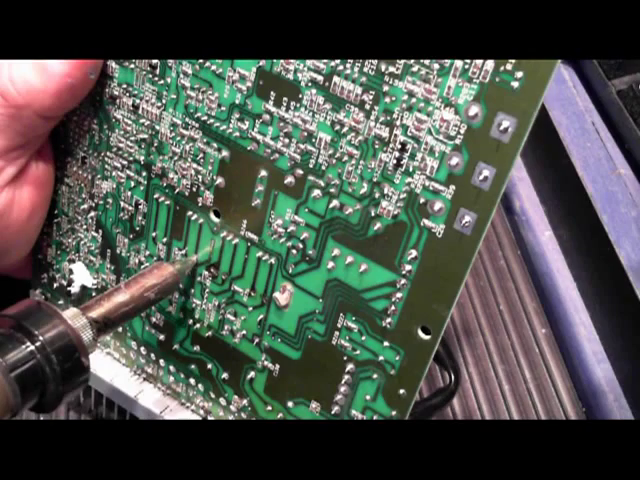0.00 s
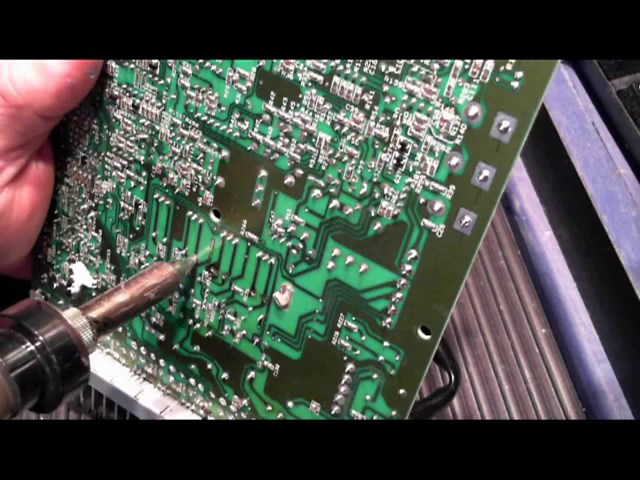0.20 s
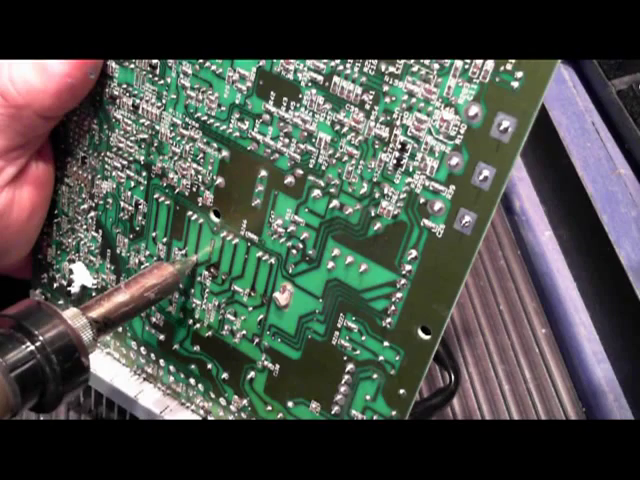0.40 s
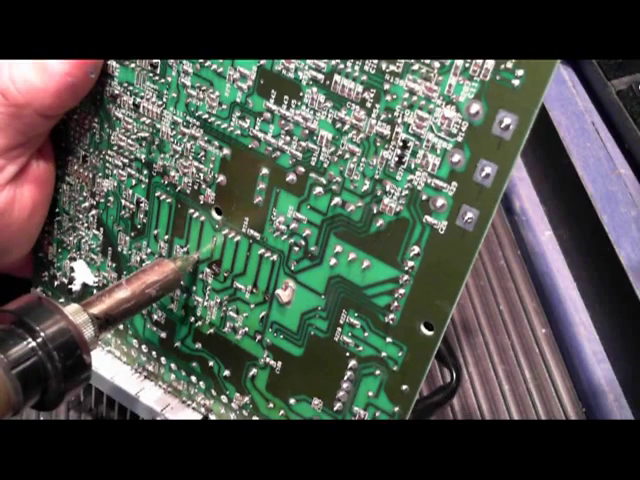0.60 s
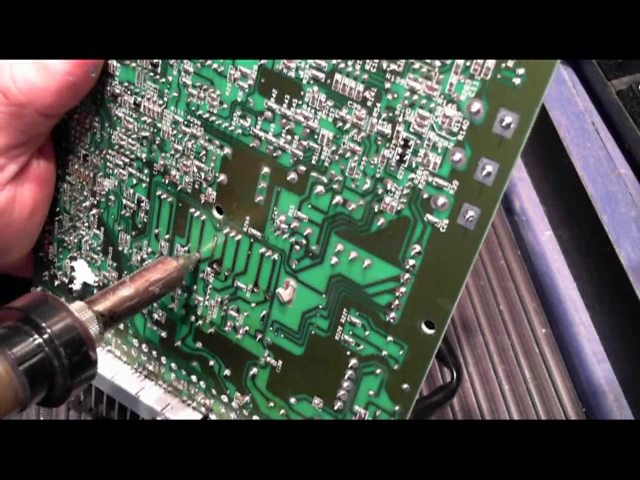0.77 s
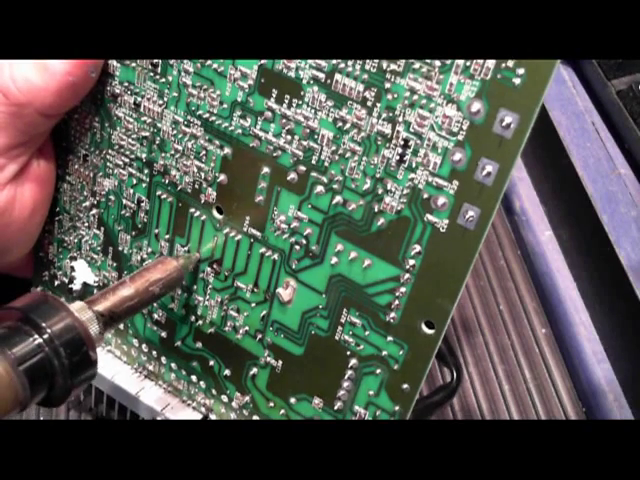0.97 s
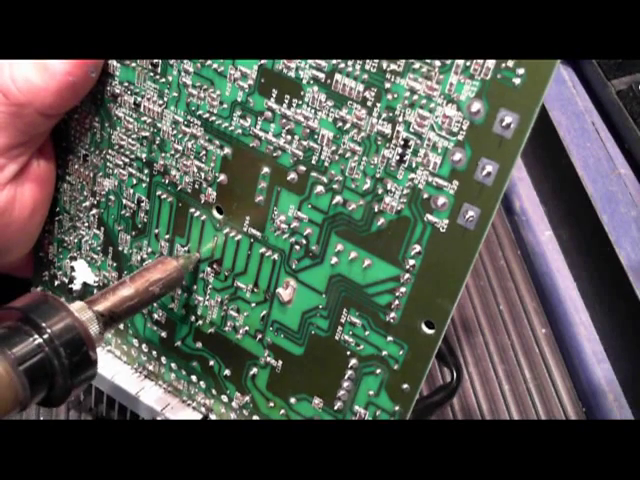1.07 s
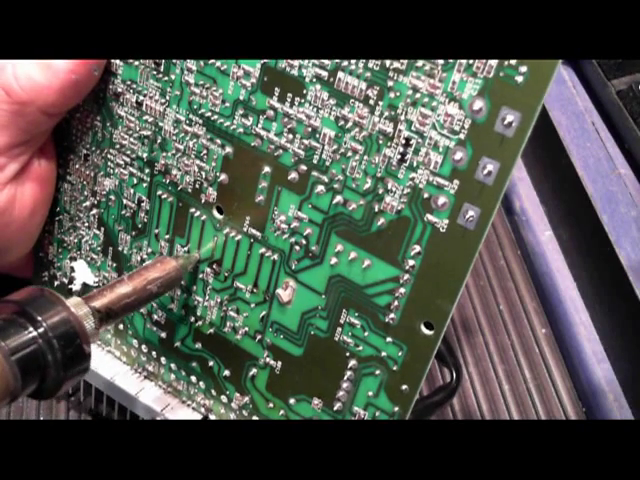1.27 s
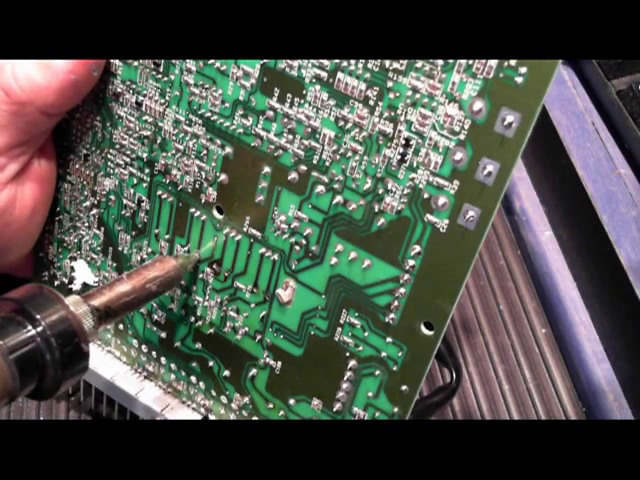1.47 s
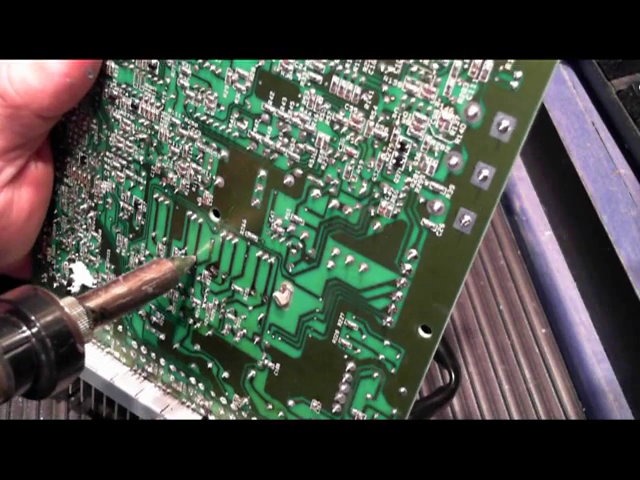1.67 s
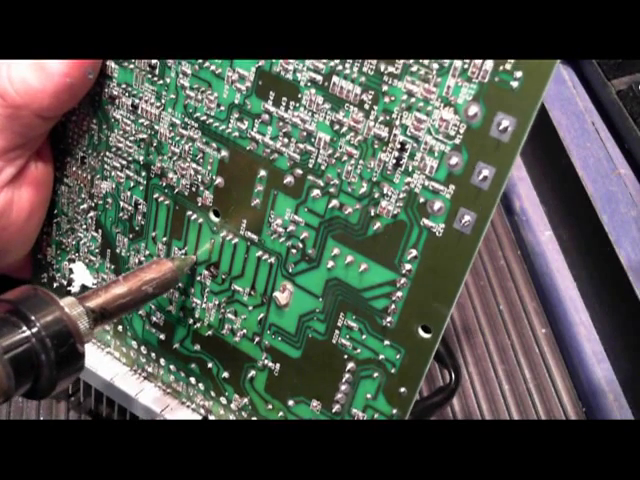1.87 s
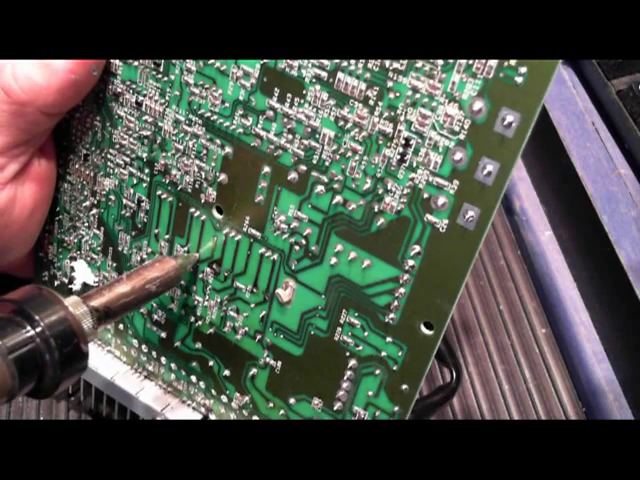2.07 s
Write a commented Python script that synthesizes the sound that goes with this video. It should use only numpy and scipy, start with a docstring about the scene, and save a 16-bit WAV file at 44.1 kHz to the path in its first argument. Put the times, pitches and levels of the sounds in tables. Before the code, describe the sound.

A desoldering gun's diaphragm pump clicks on, knocks, and revs up into a rattling, airy buzz that sags slightly, then clacks to a stop; close microphone in a quiet workshop, low rumble during the later part.

```python
"""A trigger clicks and a small pump buzzes up, sags a little under vacuum, then slows as it dies away.
It is the diaphragm pump of a desoldering gun, in a quiet workshop with low rumble buffeting the microphone.
One turning shaft times the sound: its multiples make the whine and the knock pattern, and its angle
gates the rattle and the rush of air. Noise bursts make the single knocks; fading tones and noise make
the clicks. Filtered noise makes the background and rumble."""
import sys
import numpy as np
from scipy import signal
from scipy.fft import rfft, irfft, next_fast_len
from scipy.io import wavfile
from scipy.ndimage import map_coordinates

SR = 44100
rng = np.random.default_rng(int(sys.argv[2]) if len(sys.argv) > 2 else 0)


def inscribe(sig):
    """Save sig as 16-bit PCM at rate SR to the path in sys.argv[1].

    A 1-D sig is mono; a 2-D sig holds one channel per row.
    Samples are clipped to [-1, 1] before scaling.
    """
    pcm = np.round(np.clip(np.atleast_2d(sig).T, -1, 1) * 32767)
    wavfile.write(sys.argv[1], SR, pcm.astype(np.int16))


def level_to_linear(level):
    """Convert decibel levels to linear amplitude factors, elementwise."""
    exponent = np.asarray(level, float) / 20
    return 10 ** exponent


N = 92610
TIME_S = np.arange(N) / SR

# Workshop background colour. Each row: frequency in Hz, relative level in dB per Hz.
WORKSHOP_TONE = [(59, -37), (100, -6), (355, -16), (434, -12), (489, -18.5), (648, -11.5), (702, -17),
                 (1210, -7), (2250, -4), (2700, -11.5), (4120, -14.5), (12200, -36), (15800, -63),
                 (22000, -120)]
# Low rumble on the microphone. Each row: time in seconds, level in dB.
BUFFET_LEVEL = [(0.0, -56), (0.02, -57.5), (0.84, -52), (0.87, -37.5), (0.91, -35.5), (1.0, -37),
                (1.05, -27.5), (1.09, -31.5), (1.19, -37.5), (1.21, -39), (1.24, -28), (1.39, -42),
                (1.44, -32.5), (1.64, -42.5), (1.67, -34), (1.83, -50), (1.94, -46), (2.1, -59.5)]
# Colours of the rumble and of its higher part. Each row: frequency in Hz, relative level in dB per Hz.
BUFFET_COLOUR = [(5.9, -15), (10, 16.5), (45, 8), (90, -15.5), (182, -21), (218, -31), (260, -37),
                 (340, -56), (570, -120)]
FLAP_COLOUR = [(25, -4), (50, 1), (90, -6), (140, -22.5), (250, -26), (400, -77), (600, -120)]
# How fast the room's answer dies. Each row: frequency in Hz, time to fall 60 dB in seconds.
ROOM_DECAY = [(300, 0.17), (1000, 0.45), (2000, 0.44), (10000, 0.28)]
# Trigger switch clicks. Each row: start in seconds, relative level in dB.
TRIGGER_CLICKS = [(0.2006, -26), (0.2127, -42), (1.6575, -20)]
# Ringing tones of the switch. Each row: frequency in Hz, relative level in dB, time to fall 60 dB in seconds.
SWITCH_TONES = [(3500, -10, .01), (5600, -1, .016), (7700, -4, .011)]
# Colour of each click's snap. Each row: frequency in Hz, relative level in dB.
SNAP_COLOUR = [(1200, -13), (2500, 2), (5400, -1), (8000, -7), (9000, -29), (12000, -19)]
# Last slow, dull strokes. Each row: start in seconds, relative level in dB.
LAST_THUDS = [(1.684, -37.5), (1.712, -39.5)]
# Tones of those strokes. Each row: frequency in Hz, relative level in dB, time to fall 60 dB in seconds.
THUD_TONES = [(480, 4.5, 0.027), (970, 6, 0.039)]
# Loud single knocks at start and stop. Each row: start in seconds, relative level in dB,
# relative brightness in dB.
SINGLE_KNOCKS = [(0.2305, -22.5, -1), (0.2375, -14, -2), (0.2455, -22, -21), (0.2495, -12, -4.5),
                 (0.2527, -10, -29), (0.2650, -26, -20), (1.6385, -17, -7), (1.6605, -12, -19),
                 (1.6745, -13, -20), (1.6925, -17, -24)]
# Resonances of the plastic housing. Each row: frequency in Hz, width in Hz, relative level in dB.
HOUSING_TONES = [(477, 53, -16), (690, 41, -14), (930, 110, -12.5), (1410, 73, -2), (1665, 135, -2),
                 (1926, 37, -0.5), (2025, 37, 1.5), (2230, 71, -2), (2452, 103, 0), (2640, 180, -2.5),
                 (2924, 168, -5.5), (3446, 260, -10), (4494, 430, -10), (5780, 850, -15.5)]
# Shaft speed, before the power-off slowing is taken away. Each row: time in seconds, turns per second.
SHAFT_SPEED = [(0.24, 48.5), (0.266, 54.9), (0.298, 62.8), (0.338, 72.8), (0.356, 77.0), (0.392, 83.0),
               (0.452, 89.4), (0.518, 93.1), (0.624, 92.3), (0.918, 89.0), (1.008, 88.5), (1.65, 87.4)]
# How hard the pump works. Each row: time in seconds, relative level in dB.
PUMP_EFFORT = [(0.222, -43), (0.236, -33), (0.243, -32.5), (0.25, -23.5), (0.258, -28), (0.276, -27),
               (0.45, -26.5), (0.63, -27.5), (0.85, -26), (1.05, -26), (1.2, -25.5), (1.3, -27), (1.4, -26),
               (1.55, -26), (1.64, -26), (1.678, -26.5), (1.686, -37.5), (1.697, -36), (1.708, -42.5),
               (1.73, -53)]
# Whine of the shaft. Each row: multiple of the shaft speed, relative level in dB.
WHINE_TONES = [(1, -16), (2, -19.5), (3, -18.5), (4, -8.5), (5, 1), (6, -12), (7, -10), (8, 0), (9, -12),
               (10, -8.5), (11, -9.5), (12, -7), (13, -6), (14, -25)]
# Air through the valves. Each row: frequency in Hz, relative level in dB per Hz.
AIR_COLOUR = [(120, -52), (300, -23.5), (600, -31), (1200, -11.5), (1500, -9), (2550, -4), (3600, -8.5),
              (6050, -11), (8000, -17.5), (10000, -30.5), (11500, -30.5), (14000, -66)]
# Colour of the valve tick. Each row: frequency in Hz, relative level in dB per Hz.
TICK_COLOUR = [(3000, -17), (4500, -3), (6300, 4), (9300, 2), (11500, -23.5), (14000, -35)]
# Colour of the slow shaft's rough shaking. Each row: frequency in Hz, relative level in dB per Hz.
LUG_COLOUR = [(60, -14), (200, -19.5), (330, -8), (470, 0.5), (600, -7), (950, 3.5), (1300, -11),
              (2000, -33)]
# Housing tones that ring on after the stop. Each row: frequency in Hz, relative level in dB.
RING_TONES = [(1908, 3.5), (1998, -18)]

WORKSHOP_DB, ROOM_DB = -57, -13
FLAP_DB, FLAP_GROWS = -4, 1.46  # the higher part rises faster than the rest of the rumble
SNAP_DB, SNAP_T60_S, SNAP_RISE_S = -9.5, 0.074, 0.00081
RING_SCATTER_DB = 1.5  # random difference between one event's tones and the next's
CRACK_HZ, CRACK_WIDE_HZ, CRACK_T60_S = 4600, 1500, 0.016
OFF_S, COAST_HZ_PER_S = 1.655, 750  # power cut, then the shaft slows
STROKE_DB, STROKE_JITTER_TURNS, STROKE_SCATTER_DB = -2.5, 0.0035, 2
WHINE_DB, WHINE_GROWS, WHINE_WAVER_DB = -38, 3.96, 1.1  # level; power of speed; unsteadiness
RING_DB, RING_T60_S = -17.5, 0.46
RATTLE_DB, RATTLE_GATE = -5, 0.23  # level; share gated twice a turn
GATE_SHARP = 5.8  # higher gives narrower bursts within the turn
AIR_DB, AIR_GATE, AIR_AT_TURN = -8, 0.25, 0.34  # level; gate depth; place in the turn
TICK_DB, TICK_SHARP = -26, 12
LUG_DB, LUG_BEAT_DB = -13, 1  # level; the regular beat over its noise
AIR_FADE_DB_PER_S = 250  # air and ticks thin out once the power is cut
TOP_HZ = 12050


def unit(x):
    """Scale to rms 1."""
    return x / np.sqrt(np.mean(x ** 2) + 1e-20)


def curve(rows):
    """Join (seconds, value) rows by straight lines, one value per sample."""
    seconds, values = np.transpose(rows)
    return np.interp(TIME_S, seconds, values)


def along(points, hz):
    """Join (Hz, value) points by straight lines on a log frequency axis."""
    point_hz, values = np.transpose(points)
    return np.interp(np.log(hz + 1), np.log(point_hz + 1), values)


def wobble(rate):
    """A smooth random curve with this many random points a second."""
    points = rng.standard_normal(int(N * rate / SR) + 4)
    return map_coordinates(points, [np.arange(N) * rate / SR])


def filtered(x, response):
    """Multiply the spectrum of x by a response that depends on frequency."""
    size = next_fast_len(N + SR // 2)
    hz = np.fft.rfftfreq(size, 1 / SR)
    return irfft(rfft(x, size) * response(hz), size)[:N]


def noise(colour):
    """Coloured noise of rms 1."""
    return unit(filtered(rng.standard_normal(N), lambda hz: level_to_linear(along(colour, hz))))


def turning_tone(multiple, turns):
    """A sine at a multiple of the shaft's turning, from a random phase."""
    return np.sin(2 * np.pi * (multiple * turns + rng.random()))


def turn_pulse(turns, place):
    """A smooth hump from 0 to 1, once a turn, highest at this place in the turn."""
    return 0.5 + 0.5 * np.cos(2 * np.pi * (turns - place))


def gate(turns, depth, place):
    """Loudness that swells once a turn."""
    return 1 - depth + depth * 2 * turn_pulse(turns, place) ** GATE_SHARP


def rings(events, modes, attack_s):
    """Each event starts its own set of fading sine tones."""
    out = np.zeros(N + SR)
    t = np.arange(SR // 5) / SR
    for start_s, event_db in events:
        ring = np.zeros(len(t))
        for hz, db, t60_s in modes:
            tone_db = db + rng.normal(0, RING_SCATTER_DB) - 60 * t / t60_s
            ring += level_to_linear(tone_db) * np.sin(2 * np.pi * hz * t)
        out[round(start_s * SR):][:len(t)] += level_to_linear(event_db) * ring * (1 - np.exp(-t / attack_s))
    return out[:N]


def housing(hz):
    """The plastic housing answers strongest near its resonances, which alternate in sign."""
    answer = 0
    for k, (centre, width, db) in enumerate(HOUSING_TONES):
        resonance = 1j * hz * width / (centre * centre - hz * hz + 1j * hz * width)
        answer = answer + (-1) ** k * level_to_linear(db) * resonance
    return answer


def workshop():
    """Steady coloured noise is the quiet room around the tool."""
    return level_to_linear(WORKSHOP_DB) * noise(WORKSHOP_TONE)


def rumble():
    """Low noise swells on the microphone; its higher part swells more steeply."""
    level_db = curve(BUFFET_LEVEL)
    peak_db = level_db.max()
    flap_db = peak_db + FLAP_DB + FLAP_GROWS * (level_db - peak_db)
    return level_to_linear(level_db) * noise(BUFFET_COLOUR) + level_to_linear(flap_db) * noise(FLAP_COLOUR)


def room(x):
    """A noise tail answers the sound; each frequency dies at its own speed."""
    hz, t, tail_bands = signal.stft(rng.standard_normal(SR // 2), SR, nperseg=256)
    fade = level_to_linear(-60 * t / along(ROOM_DECAY, hz)[:, None])
    tail = signal.istft(tail_bands * fade, SR, nperseg=256)[1]
    delayed = np.pad(x, (250, 0))  # in samples
    return signal.fftconvolve(delayed, tail / np.linalg.norm(tail))[:N]


def trigger():
    """Each switch click is a dry noise snap with a little ring."""
    shape = np.zeros(N)
    for start_s, db in TRIGGER_CLICKS:
        after = np.maximum(TIME_S - start_s, 0)
        fade = level_to_linear(db + SNAP_DB - 60 * after / SNAP_T60_S)
        shape += fade * (1 - np.exp(-after / SNAP_RISE_S))
    return shape * noise(SNAP_COLOUR) + rings(TRIGGER_CLICKS, SWITCH_TONES, 0.00054)


def thuds():
    """The last slow strokes ring two low, dull tones."""
    return rings(LAST_THUDS, THUD_TONES, 0.0016)


def knocks():
    """Short noise blows excite the housing, each with a crack in a higher band."""
    blows, cracks = np.zeros(N), np.zeros(N)
    t = np.arange(SR // 50) / SR
    for start_s, db, bright_db in SINGLE_KNOCKS:
        burst = rng.standard_normal((2, len(t)))
        start = round(start_s * SR)
        blows[start:][:len(t)] += level_to_linear(db + 11.5 - 60 * t / 0.0073) * burst[0]
        cracks[start:][:len(t)] += level_to_linear(db + bright_db + 5 - 60 * t / CRACK_T60_S) * burst[1]

    def crack_band(hz):
        spread = 1j * hz * CRACK_WIDE_HZ
        return (spread / (CRACK_HZ * CRACK_HZ - hz * hz + spread)) ** 2

    return filtered(blows, housing) + filtered(cracks, crack_band)


def shaft():
    """Speed added up over time gives the shaft angle in turns; cutting power slows it."""
    slowing = COAST_HZ_PER_S * np.maximum(TIME_S - OFF_S, 0)
    speed = np.maximum(curve(SHAFT_SPEED) - slowing, 5)
    return speed, np.cumsum(speed) / SR


def pump_effort():
    """Loudness of the working pump, with short ramps at both ends."""
    first, last = PUMP_EFFORT[0][0], PUMP_EFFORT[-1][0]
    start = np.clip((TIME_S - first) / 0.002, 0, 1)
    end = np.clip((last - TIME_S) / 0.0047, 0, 1)
    return level_to_linear(curve(PUMP_EFFORT)) * start * end


def whine(speed, turns):
    """Multiples of the shaft speed waver in level and grow together with speed."""
    total = sum(level_to_linear(db + WHINE_WAVER_DB * wobble(7.23)) * turning_tone(k, turns) for k, db in WHINE_TONES)
    fade_in = np.clip((TIME_S - PUMP_EFFORT[0][0]) / 0.027, 0, 1)
    return total * (speed / speed.max()) ** WHINE_GROWS * fade_in


def ring_on(effort):
    """Housing tones build up with the effort and fade slowly after it."""
    keep = np.exp(-np.log(1000) / (RING_T60_S * SR))  # share kept from one sample to the next
    level = signal.lfilter([1 - keep], [1, -keep], effort)
    tones = sum(level_to_linear(db + 3.1 * wobble(60.16)) * np.sin(2 * np.pi * hz * TIME_S + 1.24 * wobble(45))
                for hz, db in RING_TONES)
    return level * tones


def lugging(speed, turns):
    """A slow shaft shakes roughly: gated noise plus multiples of the shaft speed."""
    beat = unit(sum(level_to_linear(along(LUG_COLOUR, k * speed) + 2.5 * wobble(21.1)) * turning_tone(k, turns)
                    for k in range(1, 20)))
    slowness = np.clip(0.93 - speed / speed.max(), 0, 1) ** 0.25
    return slowness * (noise(LUG_COLOUR) * gate(turns, 0.68, 0.39) + level_to_linear(LUG_BEAT_DB) * beat)


def valve_air(turns):
    """Air rushing through the valves is noise that swells once a turn and flutters."""
    flutter = level_to_linear(0.5 * wobble(23.6) + 1.28 * wobble(300))
    return unit(noise(AIR_COLOUR) * gate(turns, AIR_GATE, AIR_AT_TURN) * flutter)


def valve_tick(uneven):
    """A narrow burst of bright noise each turn, uneven in level."""
    return unit(noise(TICK_COLOUR) * turn_pulse(uneven, 0.6) ** TICK_SHARP * level_to_linear(1.6 * wobble(49)))


def rattle(turns):
    """Random knocking in the housing swells twice a turn."""
    swell = 1 + RATTLE_GATE * np.cos(4 * np.pi * turns)
    return unit(filtered(rng.standard_normal(N) * swell * level_to_linear(1.74 * wobble(59.86)), housing))


def strokes(speed, uneven):
    """The knock pattern of each turn: shaft multiples as loud as the housing lets them be."""
    hz = np.arange(SR // 8)
    loud = np.abs(housing(hz))
    return unit(sum(np.interp(k * speed, hz, loud) * level_to_linear(STROKE_SCATTER_DB * wobble(8.6))
                    * turning_tone(k, uneven) for k in range(15, 45)))


def pump():
    """One shaft drives every pump sound; returns the tones and the rougher rush apart."""
    speed, turns = shaft()
    uneven = turns + STROKE_JITTER_TURNS * wobble(40)
    effort = pump_effort()
    tones = effort * level_to_linear(STROKE_DB) * strokes(speed, uneven)
    tones = tones + level_to_linear(WHINE_DB) * whine(speed, turns) + level_to_linear(RING_DB) * ring_on(effort)
    thinning = level_to_linear(-AIR_FADE_DB_PER_S * np.maximum(TIME_S - OFF_S, 0))
    valves = thinning * (level_to_linear(AIR_DB) * valve_air(turns) + level_to_linear(TICK_DB) * valve_tick(uneven))
    rush = effort * (level_to_linear(RATTLE_DB) * rattle(turns) + valves + level_to_linear(LUG_DB) * lugging(speed, turns))
    return tones, rush


def scene():
    """Add tool, room, background and rumble; the pump's tones get no room tail."""
    tones, rush = pump()
    tool = rush + knocks() + thuds() + trigger()
    mix = tones + tool + level_to_linear(ROOM_DB) * room(tool) + workshop() + rumble()
    return mix[None]


def roll_off(x):
    """The treble ends steeply here."""
    return signal.sosfilt(signal.butter(12, 12330, fs=SR, output="sos"), x)


def record(dry):
    """Cut away everything from TOP_HZ upwards and finish the mix."""
    mix = filtered(dry[0], lambda hz: hz < TOP_HZ)[None]
    return roll_off(mix)


dry = scene()
out = record(dry)
inscribe(out)
```